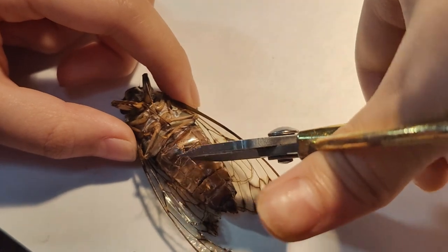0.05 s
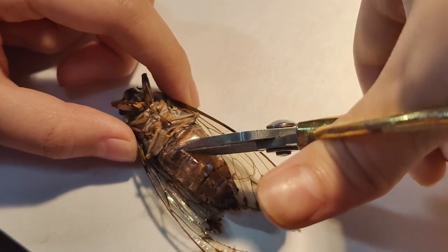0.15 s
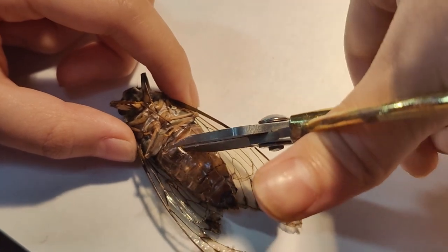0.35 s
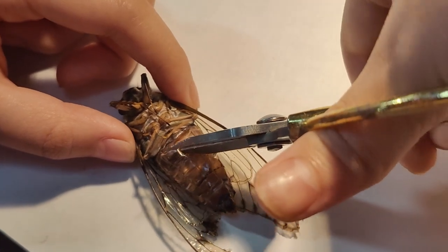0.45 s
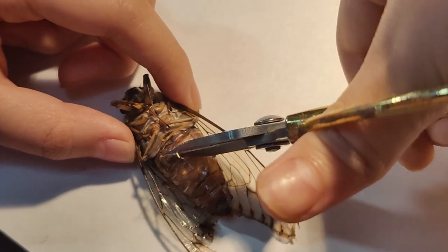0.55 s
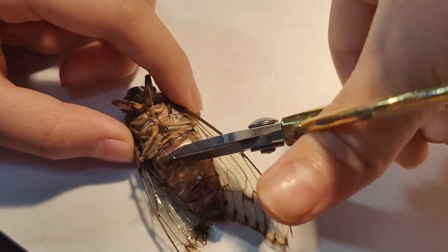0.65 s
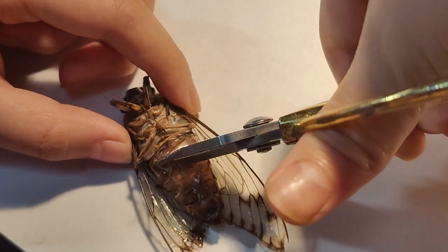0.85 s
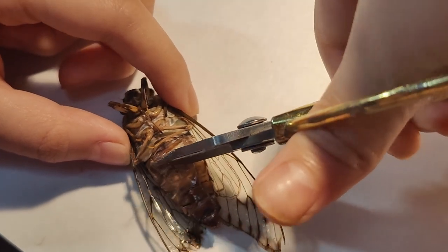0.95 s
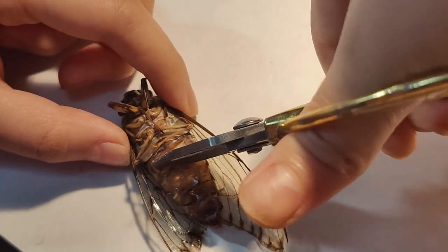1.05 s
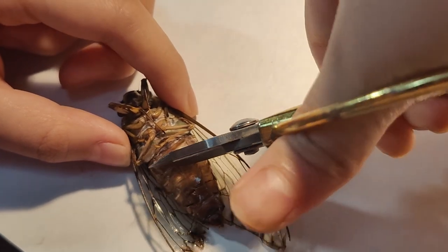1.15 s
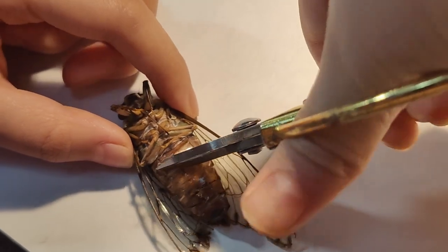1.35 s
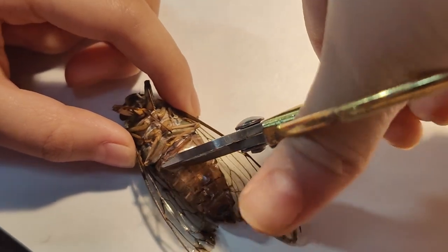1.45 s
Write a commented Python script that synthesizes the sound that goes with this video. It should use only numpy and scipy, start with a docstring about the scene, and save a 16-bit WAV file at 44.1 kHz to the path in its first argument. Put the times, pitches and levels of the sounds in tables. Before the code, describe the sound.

A dry insect shell cracks between small scissor blades, first in a single crisp snap, then in a rapid cluster and scattered weaker clicks with fine scraping. It is heard up close over a quiet room's faint rumble.

```python
"""A quiet room, a stereo pair of microphones close to small scissors cutting a dry cicada shell.
The shell gives way in single snaps and one quick run of cracks; between them the blades rub softly
and scrape up a fine crackle. Each snap rings for a millisecond near 3 kHz, scatters off hands and
table and dies in the room, over a low rumble and hum."""
import sys
import numpy as np
from scipy import signal
from scipy.fft import rfft, irfft
from scipy.io import wavfile
from scipy.ndimage import uniform_filter1d

SR = 44100
rng = np.random.default_rng(int(sys.argv[2]) if len(sys.argv) > 2 else 0)


def generate_wav(signal):
    """Clip the signal to [-1, 1] and save it as 16-bit WAV at the path in sys.argv[1]."""
    frames = np.transpose(np.atleast_2d(signal))
    scaled = np.clip(frames, -1, 1) * 32767
    pcm = np.round(scaled).astype(np.int16)
    wavfile.write(sys.argv[1], SR, pcm)


N = 66150

# The shell cracking, close up. Each row: start in seconds, peak in dB, ring in Hz,
# then bite, treble and sizzle in dB relative to the colour all cracks share.
SHELL_CRACKS = [ (.1610, -24, 2930, -6.5, -8, -7), (.2134, -7.5, 2828, -1.5, 0, -3.5),
                (.2261, -26.5, 2800, 5, 4, 32), (.2382, -36, 3030, -7, 5, 17),
                (.2875, -40.5, 2880, 10, 20, 30), (.4450, -41, 2890, 0, -5, 4),
                (.4605, -44, 2850, 2, 10, 13), (.4695, -38, 2770, -1, 0, 3), (.4749, -33.5, 2830, 5, 5, 16),
                (.5575, -33.5, 2880, 4, 10, 21), (.5644, -25.5, 2850, 9, -1, 15),
                (.6267, -23.5, 3000, -1.5, 4.5, 4), (.6400, -30, 3040, -4, -3, -14),
                (.6451, -24.5, 3020, 6, 9.5, 16), (.6544, -37, 3040, 1, 5, -3),
                (.6653, -19, 2860, 0.5, 11, 9), (.6819, -20.5, 3030, -4, 7, 13),
                (.6855, -29, 2870, -3, -2, 10), (.7085, -9, 2900, -2, 4, -0.5),
                (.7191, -36, 2940, -4, 5, -17), (.7346, -14.5, 3030, 1, 11, 5),
                (.7497, -9, 3010, 5, 9, 11.5), (.7607, -42, 3100, 0, 0, 4),
                (.7675, -21.5, 2930, -14, 6, -20), (.7817, -18.5, 2840, -6, 7, 1),
                (.7829, -10, 2920, -0.5, 2.5, -1.5), (.8732, -37, 2850, 14, -6, 3),
                (.8853, -25.5, 2900, 5.5, 17.5, 27.5), (.9389, -36, 2980, 1, 0, -5),
                (.9477, -26, 2850, -1, 10, 30), (.9511, -28, 2940, 1, 7, 19.5),
                (.9554, -30.5, 2870, 2, 7, 10), (.9582, -45, 2880, -9, 0, 6),
                (.9938, -28, 2930, 3.5, 1.5, 11.5), (1.0760, -40, 2930, 12, 7, 27),
                (1.1021, -21.5, 2920, 6.5, -2.5, 2), (1.1317, -26.5, 2830, 4.5, 2, 13.5),
                (1.1581, -34, 3220, 17, 12.5, 21), (1.1983, -37, 3000, 13, 12, 3),
                (1.2052, -33, 3010, 12, 10, 9), (1.2261, -34, 3000, 0, 10, 7.5),
                (1.2314, -41, 2950, 13, 2, 8), (1.2367, -27.5, 3040, 13, 13, 14),
                (1.2405, -34, 2830, 8, 12, 28), (1.2425, -27.5, 2940, 2, 5, 7),
                (1.2607, -22.5, 2740, 12.5, 7, 13), (1.2681, -33, 2930, 9, 10, 19),
                (1.4943, -23, 2980, 12, 11, 22)]
# That shared colour. Each row: frequency in Hz, level in dB at the left microphone, then at the right.
CRACK_COLOUR = [(298, -69, -52), (1070, -28.5, -33), (1903, -26.5, -27.5), (2223, -8, -6),
                (2622, 1.5, -2.5), (2807, 5, 7.5), (3224, -1, 5), (3594, -7, -9.5), (4450, -58.5, -4),
                (5430, -10.5, -12.5), (5830, -18.5, -11.5), (6330, -18, -3), (6860, -16.5, -35.5),
                (7440, -13.5, -16), (8270, -23, -43), (9260, -37, -32), (11400, -50.5, -37.5),
                (13360, -30.5, -34), (15640, -25, -24), (15000, -48, -43)]
# Fine crackle of the blades on the shell. Each row: time in seconds, level in dB.
SCRAPE_LEVELS = [(.2, -88), (.23, -57.5), (.28, -60.5), (.32, -73), (.40, -81), (.47, -60), (.51, -73),
                 (.555, -55.5), (.615, -66), (.65, -57), (.76, -55), (.85, -73), (.90, -53), (.925, -69.5),
                 (.95, -44), (0.978, -60.5), (1.061, -68), (1.111, -55), (1.145, -60), (1.19, -59.5),
                 (1.238, -51.5), (1.309, -68.5), (1.369, -59), (1.40, -67), (1.44, -59.5), (1.5, -63)]
# Colour of the crackle. Each row: frequency in Hz, relative level in dB.
SCRAPE_COLOUR = [(300, -37), (1800, -15), (2300, -6), (2950, 3.5), (3600, -10), (4700, -6.5), (5700, -7),
                 (6400, -11), (7800, -8.5), (9500, -25), (12000, -19.5), (14700, -15.5), (16000, -11)]
# Soft, dull rub of the blades before they bite. Each row: time in seconds, level in dB.
RUB_LEVELS = [(0, -73), (.03, -59.5), (.08, -57), (.11, -60.5), (.15, -65.5), (.19, -57), (.25, -70),
              (.30, -65.5), (.35, -62), (.39, -70), (.44, -71.5), (.5, -95)]
# Colour of the rub. Each row: frequency in Hz, relative level in dB.
RUB_COLOUR = [(300, -22), (1800, -15), (2350, -4), (2950, 6), (3600, -12.5), (4800, -10.5), (5700, -21),
              (6400, -13.5), (7500, -35), (9000, -56), (16000, -49)]
# Rumble of the room. Each row: frequency in Hz, relative level in dB.
RUMBLE_COLOUR = [(15, -7), (25, -3), (35, -10), (50, -8), (90, -1.5), (170, -2), (220, -3), (310, -5),
                 (380, -7), (460, -18), (720, -18), (1400, -27), (2000, -29), (3000, -33), (4000, -38),
                 (6500, -36.5), (9000, -59), (16000, -46)]
# Tones of the room's hum. Each row: frequency in Hz, level in dB.
HUM_TONES = [(48.4, -62.5), (129.2, -66.5), (215.3, -60.5), (242.2, -64.5), (290.7, -65)]

RING_HZ = 2928  # main ring of the shared crack colour
BAND_HZ = (3420, 4490, 6200, 7260, 11900)  # body, bite, treble from and to, sizzle
RIPPLE_DB, RIPPLE_HZ = 2.42, 512  # every splinter rings a little differently
RUN_S, RUN_BAND_HZ = .0006, 1260  # a crack takes this long to run; bands this wide sound at their own moment


def shell_cracks(size=1024, right_lag_s=.00009):
    """Each fracture runs for under a millisecond and rings briefly; finer splinters are brighter."""
    out = np.zeros((2, N + size))
    hz = np.fft.rfftfreq(size, 1 / SR)
    colour = np.array(CRACK_COLOUR, float)
    microphones = colour[:, :2], colour[:, ::2]
    right_lag = np.exp(-2j * np.pi * hz * right_lag_s)
    for start_s, peak_db, ring_hz, bite_db, treble_db, sizzle_db in SHELL_CRACKS:
        ripple_db = RIPPLE_DB * np.interp(hz / RIPPLE_HZ, np.arange(size), rng.standard_normal(size))
        delay_s = RUN_S * np.interp(hz / RUN_BAND_HZ, np.arange(size), rng.random(size))
        run = np.exp(-2j * np.pi * np.cumsum(delay_s) * SR / size)
        own_db = ripple_db + np.interp(hz, BAND_HZ, (0, bite_db, treble_db, treble_db, sizzle_db))
        retuned_hz = hz * np.interp(hz, BAND_HZ[1:3], (RING_HZ / ring_hz, 1))  # the treble stays put
        left, right = (shell_ring(contour(mic, retuned_hz) + own_db) for mic in microphones)
        snap = irfft(np.array([left, right * right_lag]) * run)
        snap = np.roll(snap, size // 2, axis=1)
        start = int(start_s * SR)
        out[:, start:start + size] += undb(peak_db) * snap / np.abs(snap).max()
    return out[:, size // 2:size // 2 + N]


def shell_ring(db, skew=0.69):
    """Spectrum of a short ring: at skew 1 it starts at once, at 0 it rises and falls alike."""
    cepstrum = irfft(np.log(undb(db)))
    half = len(cepstrum) // 2
    cepstrum[1:half] *= 2  # fold forward for minimum phase
    cepstrum[half + 1:] = 0
    return undb(db) * np.exp(1j * skew * rfft(cepstrum).imag)


def blade_friction(levels, colour, grains_per_s=1300, spread_db=8, shared=0.33):
    """Dense tiny slips and fractures of uneven size as the blades slide and press."""
    slips = (rng.random((3, N)) < grains_per_s / SR) * rng.choice([-1, 1], (3, N))
    grains = slips * undb(spread_db * np.clip(rng.standard_normal((3, N)), -2, 2))
    stereo = np.sqrt(shared) * grains[2] + np.sqrt(1 - shared) * grains[:2]  # both microphones hear row 2
    level_db = np.interp(np.arange(N) / SR, *np.array(levels).T)
    return unit(tint(stereo, colour)) * undb(level_db)


def reflections(x, delay_s, t60_s, db):
    """Diffuse reflections that die away, different at each microphone."""
    t = np.arange(N // 3) / SR
    decay = (t > delay_s) * np.exp(-np.log(1000) * t / t60_s)
    tail = rng.standard_normal((2, len(t))) * decay
    tail *= undb(db) / np.sqrt(np.sum(tail ** 2, axis=1, keepdims=True))
    return signal.fftconvolve(x, tail, axes=1)[:, :N]


def room_rumble(mid_db=-54.5, apart_hz=724):
    """Low rumble of the room, nearly alike at both microphones in the bass and wider above."""
    hz = np.fft.rfftfreq(N, 1 / SR)
    mid, side = (unit(tint(rng.standard_normal(N), RUMBLE_COLOUR)) for _ in range(2))
    width = np.clip((hz / apart_hz) ** 2, .18, .9)
    side = irfft(rfft(side) * width, N)
    return undb(mid_db) * np.array([mid + side, mid - side])


def room_hum(waver_hz=3.574):
    """Faint low tones behind the scissors, each wavering in pitch on its own."""
    hum = np.zeros(N)
    for hz, db in HUM_TONES:
        cycles = rng.random() + np.cumsum(hz + waver_hz * drift(12)) / SR
        hum += undb(db) * unit(np.sin(2 * np.pi * cycles))
    return hum


def undb(db):
    """Decibels to amplitude."""
    return 10 ** (np.asarray(db) / 20)


def unit(x):
    """Scale to an RMS of 1."""
    return x / np.sqrt(np.mean(x ** 2))


def contour(points, hz):
    """Levels in dB joined on a log-frequency axis."""
    point_hz, db = np.array(points, float).T
    return np.interp(np.log(hz + 1), np.log(point_hz), db)


def tint(x, points):
    """Give a signal the colour of (Hz, dB) points."""
    gain = undb(contour(points, np.fft.rfftfreq(N, 1 / SR)))
    return irfft(rfft(x) * gain, N)


def drift(steps_per_s):
    """Smooth random drift with a spread near 1."""
    hold = int(SR / steps_per_s)
    steps = np.repeat(rng.standard_normal(N // hold + 1), hold)
    return unit(uniform_filter1d(steps, hold)[:N])


def scene():
    """Cracks, crackle and rub up close, their duller reflections, and the room tone behind."""
    cutting = shell_cracks()
    cutting += blade_friction(SCRAPE_LEVELS, SCRAPE_COLOUR)
    cutting += blade_friction(RUB_LEVELS, RUB_COLOUR)
    dulled = signal.lfilter(*signal.butter(1, 9400, fs=SR), cutting)
    hands_and_table = reflections(dulled, delay_s=.00121, t60_s=.016, db=-7.5)
    room = reflections(dulled, delay_s=.0061, t60_s=.19, db=-16.5)
    balance = undb([[.55], [-.55]])  # room tone is 1.1 dB louder on the left
    return cutting + hands_and_table + room + balance * (room_rumble() + room_hum())


def record(dry, top_hz=15650):
    """The recorder cuts the top steeply."""
    return signal.sosfilt(signal.ellip(8, .2, 70, top_hz, fs=SR, output="sos"), dry)


dry = scene()
out = record(dry)
generate_wav(out)
```